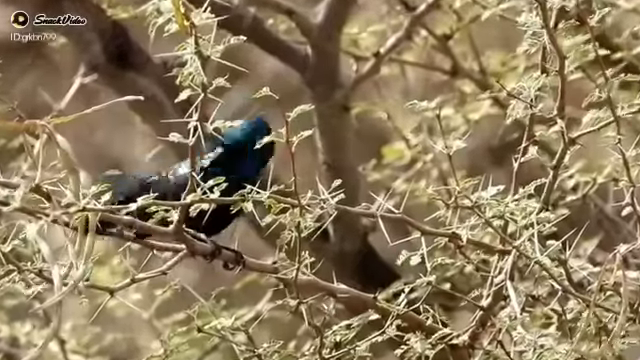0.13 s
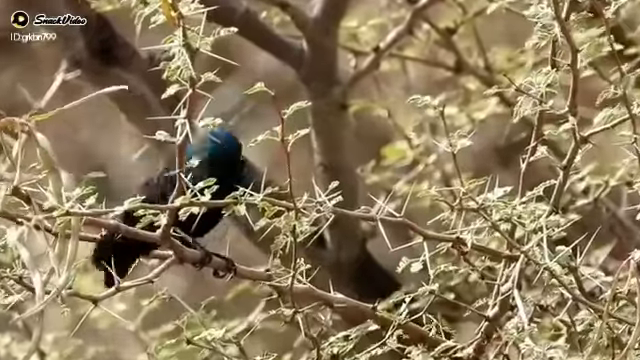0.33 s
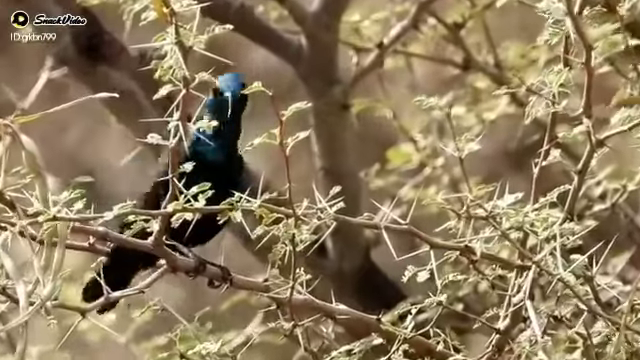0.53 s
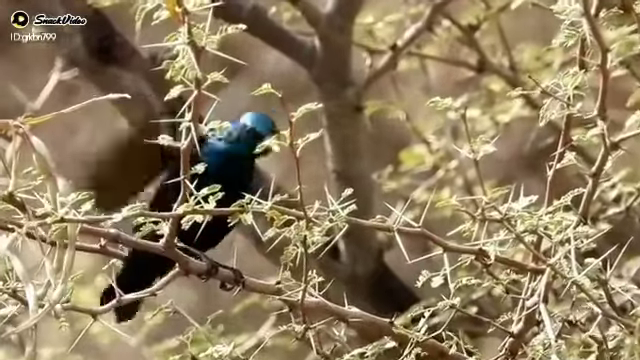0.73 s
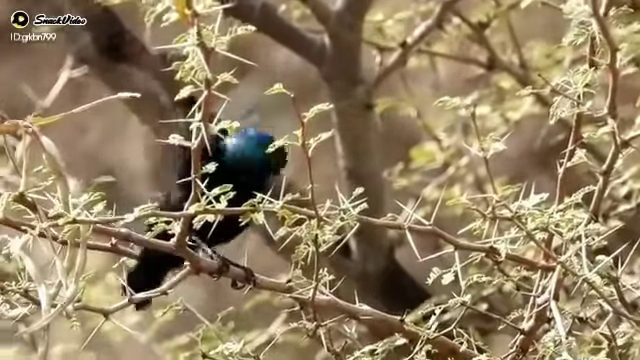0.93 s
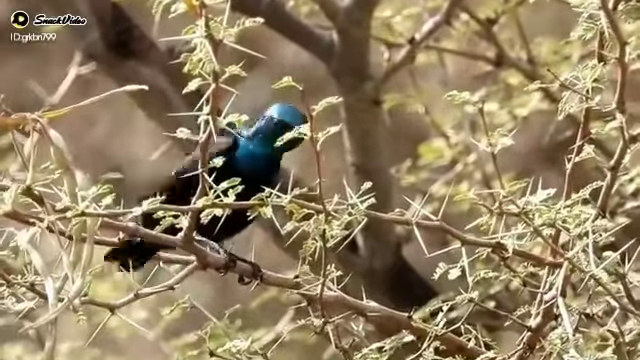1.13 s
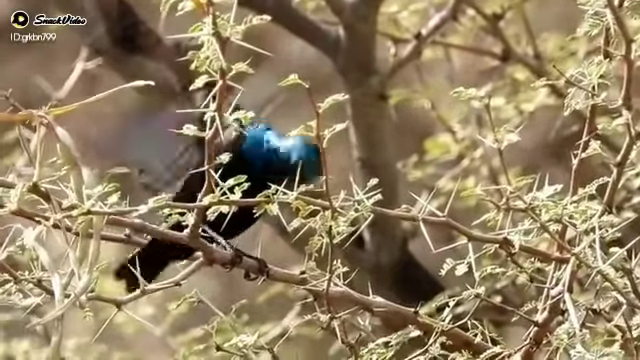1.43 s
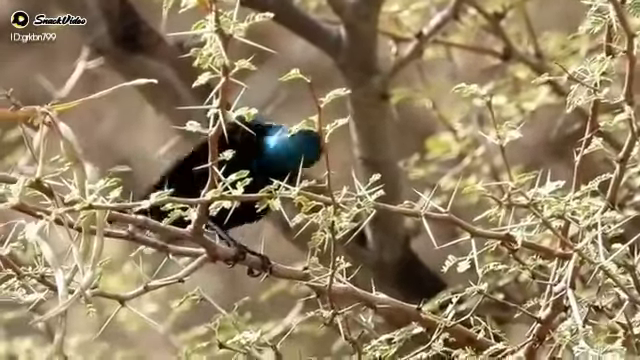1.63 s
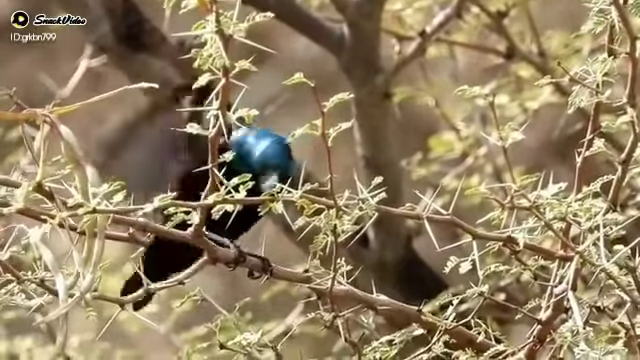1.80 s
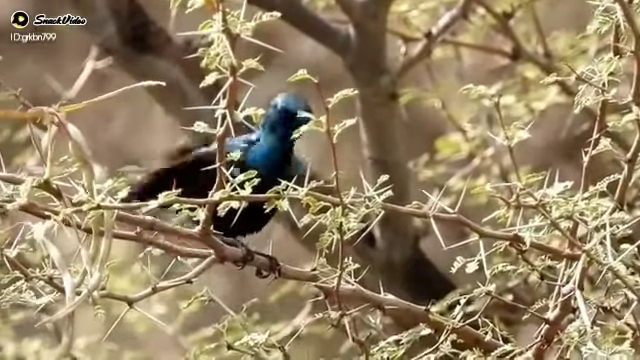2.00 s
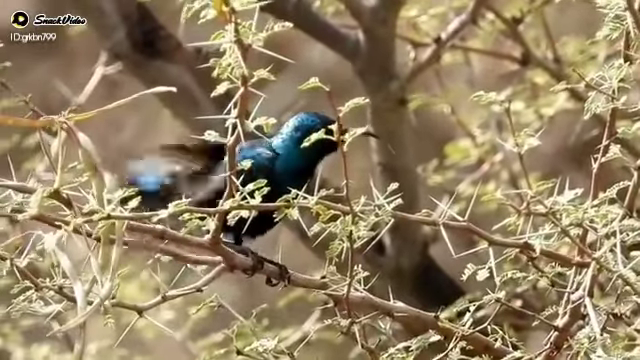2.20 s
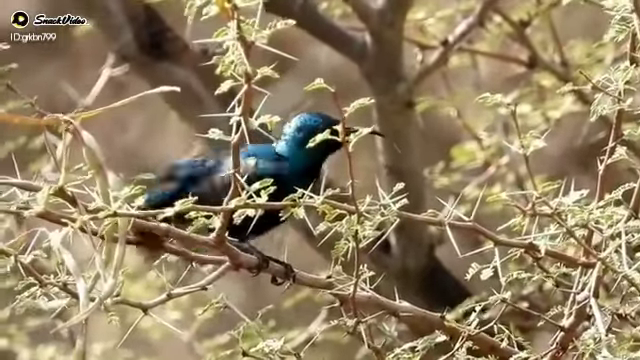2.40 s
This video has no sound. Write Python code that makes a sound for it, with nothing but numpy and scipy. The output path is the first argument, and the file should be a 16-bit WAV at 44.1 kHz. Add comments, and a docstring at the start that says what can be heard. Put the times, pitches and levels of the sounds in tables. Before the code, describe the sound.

A small bird repeats a broken, husky two-part whistle while another gives sharp raspy chirps outdoors

```python
"""A low outdoor wash, an insect-like hiss (both shaped noise) and a far, wavering hum (a sine) come first.
Then a bird gives short raspy chirps, mostly a little louder on the right: pulses and breath ring its throat.
Another bird in the thorn bush repeats a two-part whistle near 2.7 kHz, made of gliding sines.
The whistle breaks every few hundredths of a second, with husky side notes, breath and buzzy flares around it.
Noise tails that fade add the echo of the bush and a slower, fainter answer to the whistle."""
import sys
import numpy as np
from scipy import signal
from scipy.fft import rfft, irfft, next_fast_len
from scipy.io import wavfile
from scipy.ndimage import uniform_filter1d, map_coordinates

SR = 44100
rng = np.random.default_rng(int(sys.argv[2]) if len(sys.argv) > 2 else 0)


def generate_wav(sig):
    """Save sig (samples, or channels by samples) to the path in sys.argv[1] as 16-bit PCM at SR."""
    pcm = np.round(np.clip(np.atleast_2d(sig).T, -1, 1) * 32767).astype(np.int16)
    wavfile.write(sys.argv[1], SR, pcm)


N = 112454  # samples, about 2.55 s


def amp(db):
    """Decibels to gain."""
    return 10 ** (np.asarray(db) / 20)


def unit(x):
    """Scale to an average power (rms) of 1."""
    return x / np.sqrt(np.mean(x ** 2) + 1e-20)


def along(points, hz):
    """Read a table of (frequency, value) points on a logarithmic pitch axis."""
    f, v = np.transpose(points)
    return np.interp(np.log(hz + 1), np.log(f + 1), v, left=v[0], right=v[-1])


def curve(rows):
    """Join (time, value) rows with straight lines, one value per sample."""
    return np.interp(np.arange(N) / SR, *np.transpose(rows))


def wobble(rate):
    """A smooth random curve around 0 through this many random points a second."""
    points = rng.standard_normal(int(N / SR * rate) + 4)
    return map_coordinates(points, [np.arange(N) * rate / SR])


def filtered(x, response):
    """Change the strength and phase of each frequency as the response says."""
    m = next_fast_len(N + SR // 2)
    return irfft(rfft(x, m) * response(np.fft.rfftfreq(m, 1 / SR)), m)[..., :N]


def coloured(spectrum):
    """Mono noise of rms 1, silent outside the spectrum."""
    def response(f):
        inside = (f > spectrum[0][0]) & (f < spectrum[-1][0])
        return amp(along(spectrum, f)) * inside
    return unit(filtered(rng.standard_normal(N), response))


def peak(hz, wide_hz):
    """A resonance: a hollow space favours frequencies around one pitch."""
    return lambda f: 1j * f * wide_hz / (hz * hz - f * f + 1j * f * wide_hz)


def swell(at, rise, fall, top_s):
    """A rounded peak at a time in s, with straight flanks in dB/s."""
    u = np.arange(N) / SR - at
    slope = np.where(u < 0, rise, fall)
    return amp(-slope * (np.sqrt(u * u + top_s ** 2) - top_s))


# How alike the background noise is in both ears: (frequency [Hz], likeness [-1 to 1])
LIKENESS = [(80, 0.33), (150, 0.98), (370, 0.94), (900, 0.77), (2240, 0.62), (5520, 0.016), (13600, 0.78)]


def rush(spectrum, patchy_db):
    """Stereo noise of rms 1: patches in time and pitch differ in strength, and the ears differ by pitch."""
    z = signal.stft(rng.standard_normal((2, N)), nperseg=512)[2]
    patches = uniform_filter1d(rng.standard_normal(z.shape[1:]), 5, 0)
    patches = unit(uniform_filter1d(patches, 12, 1))
    pair = signal.istft(z * amp(patchy_db * patches), nperseg=512)[1][:, :N]

    def response(hz):
        gain = amp(along(spectrum, hz)) * (hz > spectrum[0][0])
        turn = np.arccos(np.clip(along(LIKENESS, hz), -1, 1)) / 2
        return gain * [np.cos(turn), np.sin(turn)]  # shared part, opposite part
    mid, side = filtered(pair, response)
    return unit(np.array([mid + side, mid - side]))


# Low wash, tone colour: (frequency [Hz], relative level [dB])
WASH_SPECTRUM = [(15, -63), (25, -18.5), (75, -26), (202, -2), (298, -8), (525, -9), (805, -7.5),
                 (1010, -15.5), (2780, -14), (3200, -32), (4160, -49.5), (7040, -120)]
# Low wash, loudness before its small wobble: (time [s], level [dB])
WASH_LOUDNESS = [(0, -48), (1.1, -48), (1.4, -49.5), (2.15, -47), (2.26, -53), (2.4, -54), (2.55, -52)]


def low_wash():
    """Low outdoor noise whose level slowly shifts."""
    level_db = curve(WASH_LOUDNESS) + 0.39 * wobble(3.1)
    return amp(level_db) * rush(WASH_SPECTRUM, patchy_db=2.2)


# Insect-like hiss, tone colour: (frequency [Hz], relative level [dB])
HISS_SPECTRUM = [(2600, -22), (3200, -10), (4100, 0), (5300, 1.7), (6600, -11.5), (8600, -15.5),
                 (10500, -18.5), (12000, -36.5), (12600, -66.5), (14000, -67.5)]
# Insect-like hiss, loudness before its small wobble: (time [s], level [dB])
HISS_LOUDNESS = [(0, -46.5), (.6, -46), (.95, -47), (1.3, -55.5), (1.6, -48), (2.0, -50), (2.42, -55.5),
                 (2.55, -56.5)]


def insect_hiss():
    """High noise, strongest around 4 to 5 kHz, with changing level."""
    level_db = curve(HISS_LOUDNESS) + 0.3 * wobble(9.78)
    return amp(level_db) * rush(HISS_SPECTRUM, patchy_db=3)


HUM_HZ, HUM_WIDE_HZ = 197.9, 14.4  # centre; twice the typical pitch wander
HUM_DB, HUM_WAVER_DB = -54.5, 4  # middle level; largest swing up or down


def far_hum():
    """A low sine whose pitch and level wander at random."""
    pitch = HUM_HZ + HUM_WIDE_HZ / 2 * wobble(11)
    level_db = HUM_DB + HUM_WAVER_DB * np.tanh(wobble(7.2))
    return np.sqrt(2) * amp(level_db) * np.sin(2 * np.pi * np.cumsum(pitch) / SR)


FLOOR_LEFT_DB = -0.8  # left ear compared with right


def surroundings():
    """Wash, hiss and hum add up, slightly weaker on the left."""
    balance = amp([[FLOOR_LEFT_DB / 2], [-FLOOR_LEFT_DB / 2]])
    return (low_wash() + insect_hiss() + far_hum()) * balance


def echo(x, decays):
    """Branches and ground scatter the sound; each frequency dies at its own speed, within half a second."""
    hz, t, z = signal.stft(rng.standard_normal((2, SR // 2)), SR, nperseg=256)
    fading = amp(-60 * t / along(decays, hz)[:, None])
    tail = signal.istft(z * fading, SR, nperseg=256)[1]
    return signal.fftconvolve(np.atleast_2d(x), tail / np.linalg.norm(tail[0]), axes=1)[:, :N]


# How long the bush rings: (frequency [Hz], time to fade by 60 dB [s])
BUSH_DECAY = [(2000, 0.1), (3000, 0.39), (5500, 0.32), (10000, 0.078)]


def bush_echo(x):
    """The short scattering tail of the bush, used for both birds."""
    return echo(x, BUSH_DECAY)


THROAT_WIDE_HZ, SKIRT_DB = 290, -11  # spread of the main band; level of its skirt


def throat(hz):
    """The throat favours a bell-shaped band, with a weak skirt three times as broad."""
    def bell(f, wide):
        return np.exp(-.5 * ((f - hz) / wide) ** 2)
    return lambda f: bell(f, THROAT_WIDE_HZ) + amp(SKIRT_DB) * bell(f, 3 * THROAT_WIDE_HZ)


PULSES_PER_S, PULSE_SCATTER = 175, .2  # middle rate; its random spread (natural log)
PULSE_DB, BREATH_DB = 2.5, -2  # pulse unevenness; shared breath compared with the pulses
CHIRP_SPREAD_DB = 3  # each ear's own noise compared with the shared noise


def two_ear_noise():
    """Noise shared by both ears plus separate noise in each."""
    shared = rng.standard_normal(N)
    return shared + amp(CHIRP_SPREAD_DB) * rng.standard_normal((2, N))


def rasp_drive():
    """Uneven pulses of random sign, mixed with breath."""
    rate = PULSES_PER_S * np.exp(PULSE_SCATTER * wobble(120))
    beat = np.floor(np.cumsum(rate) / SR)
    pulses = np.diff(beat, prepend=0) * amp(PULSE_DB * wobble(300)) * np.sign(wobble(400))
    return unit(pulses) + amp(BREATH_DB) * two_ear_noise()


TOP_S, FIZZ_TOP_S = .015, .004  # rounding of the throat peak and of the hiss peak
FIZZ_LEAD_S, FIZZ_RISE, FIZZ_FALL = 0.023, 1, 0.36  # hiss peaks earlier; its slopes over the chirp's
FIZZ_GRAIN_DB = 3  # fast roughness of the hiss
CHIRP_LAG_S, CHIRP_ECHO_DB = .00001, -15.5  # left ear leads; echo level
# Raspy chirps: (peak time [s], rise [dB/s], fall [dB/s], level [dB], throat pitch [Hz],
# left over right [dB], hiss over throat sound [dB], brightness [stretch of the hiss spectrum])
RASPY_CHIRPS = [(0.252, 1200, 800, -20, 5220, -4, -13, .62), (1.02, 1000, 750, -23, 5300, -2.5, -11, .98),
                (1.747, 700, 1300, -17, 5350, -0.3, -10, .97),
                (2.248, 1300, 1100, -19, 5500, -4.5, -13, 1.1), (2.366, 600, 600, -33.5, 5850, -3, -10, .9),
                (1.673, 300, 203, -41, 5250, -2, -8, .8), (1.858, 450, 450, -39, 5020, -1.5, -15, .75),
                (2.52, 400, 400, -50, 5630, 0, -10, .75), (0.701, 254, 255, -50, 5300, 0, -15, .75),
                (1.40, 350, 300, -50, 5270, -2, -12, .75)]
# Chirp hiss, tone colour at brightness 1: (frequency [Hz], relative level [dB])
CHIRP_HISS = [(2300, -22), (3600, -12), (4500, -17), (6000, -13.5), (6900, -2), (7600, -11.5), (8500, -19),
              (10500, -32.5), (12500, -50), (14200, -66.5)]


def rasper():
    """Pulses and breath ring the throat; a broad hiss peaks before each ring."""
    drive, air = rasp_drive(), two_ear_noise()
    grain = amp(FIZZ_GRAIN_DB * wobble(350))
    chirps = np.zeros((2, N))
    for s, rise, fall, db, hz, left_db, hiss_db, bright in RASPY_CHIRPS:
        fizz = unit(filtered(air, lambda f: amp(along(CHIRP_HISS, f / bright)) * (f > CHIRP_HISS[0][0])))
        hiss_shape = swell(s - FIZZ_LEAD_S, rise * FIZZ_RISE, fall * FIZZ_FALL, FIZZ_TOP_S)
        hiss = amp(hiss_db) * grain * fizz * hiss_shape
        ring = unit(filtered(drive, throat(hz))) * swell(s, rise, fall, TOP_S)
        balance_db = np.array([[left_db], [-left_db]]) / 2
        chirps += amp(db + balance_db) * (ring + hiss)
    # a phase that grows with frequency is a tiny time shift
    near = filtered(chirps, lambda f: np.exp(1j * np.pi * np.outer([1, -1], f * CHIRP_LAG_S)))
    return near + amp(CHIRP_ECHO_DB) * bush_echo(chirps)


EDGE_S, OCTAVE_DB = .0022, -42  # half the fade time; octave compared with the main tone
DROOP, ARCH_DB = 1.5, 1.5  # a note holds, then gives way (power of time); swell in its middle


def notes(rows, quaver_db, quaver_hz, sag_hz):
    """Gliding sines with soft edges, a weak octave and random quaver; also returns their envelope."""
    t, out, level = np.arange(N) / SR, np.zeros(N), np.zeros(N)
    shake, drift = amp(quaver_db * wobble(220)), quaver_hz * wobble(160)
    for s, length, hz0, hz1, db0, db1 in rows:
        span = slice(int((s - EDGE_S) * SR), int((s + length + EDGE_S) * SR))
        u = t[span] - s
        to_edge = np.minimum(u + EDGE_S / 2, length + EDGE_S / 2 - u)
        edge = np.sin(np.pi / 2 * np.clip(to_edge / (2 * EDGE_S), 0, 1)) ** 2
        pitch = hz0 + (hz1 - hz0) * u / length + drift[span] - sag_hz * (1 - edge)
        phase = 2 * np.pi * np.cumsum(pitch) / SR
        level_db = db0 + (db1 - db0) * abs(u / length) ** DROOP + ARCH_DB * np.sin(np.pi * u / length)
        gain = edge * amp(level_db) * shake[span]
        out[span] += np.sqrt(2) * gain * (np.sin(phase) + amp(OCTAVE_DB) * np.sin(2 * phase))
        level[span] += gain
    return out, level


ASIDE_S = .006  # length of each side note
# Faint husky low notes in the breaks, before quaver and swell: (time [s], pitch [Hz], level [dB])
SIDE_NOTES = [(.431, 2150, -33), (.462, 2340, -32), (.505, 2350, -28), (.529, 2310, -29), (.851, 2190, -30),
              (.875, 2190, -32.5), (1.191, 2200, -26), (1.2125, 2153, -25), (1.586, 2200, -31),
              (1.608, 2230, -31), (1.6375, 2200, -27), (2.128, 2300, -29), (2.150, 2270, -29)]


def side_notes():
    """Very short, shaky low sines in the breaks of the whistle."""
    rows = [(s, ASIDE_S, hz, hz, db, db) for s, hz, db in SIDE_NOTES]
    return notes(rows, quaver_db=-5.0, quaver_hz=38.5, sag_hz=0)[0]


FLARE_HZ, FLARE_WIDE_HZ, FLARE_TOP_S = 3450, 450, 0.006  # upper band, resonance width, peak rounding
FLARE_LOW_HZ, FLARE_LOW_DB = 2036, -6  # lower band and its relative level
# Buzzy flares between the two parts of the whistle:
# (peak time [s], rise [dB/s], fall [dB/s], level [dB])
BUZZ_FLARES = [(0.473, 696, 489, -38.5), (0.812, 912.5, 509, -33.5), (1.156, 905, 512.5, -35),
               (1.594, 900, 610, -39), (2.094, 593, 601, -35.5)]


def buzzy_flares():
    """Noise through two resonances swells up and dies away."""
    def two_bands(f):
        upper = peak(FLARE_HZ, FLARE_WIDE_HZ)(f) ** 2
        lower = peak(FLARE_LOW_HZ, FLARE_WIDE_HZ)(f) ** 2
        return upper + amp(FLARE_LOW_DB) * lower
    buzz = unit(filtered(rng.standard_normal(N), two_bands))
    return buzz * sum(amp(db) * swell(s, rise, fall, FLARE_TOP_S) for s, rise, fall, db in BUZZ_FLARES)


HUSK_DB, HAZE_DB = -27, -25.5  # breath and high breath compared with the whistle
JOIN_DB, JOIN_S = -28, 0.07  # gain and reach of the breath that bridges the gaps
# Breath around the whistle, tone colour: (frequency [Hz], relative level [dB])
BREATH_SPECTRUM = [(1900, -42), (2100, 3), (2500, 3.5), (2900, 9.5), (3100, -33.5)]
# Breathy overtone, tone colour: (frequency [Hz], relative level [dB])
HIGH_BREATH_SPECTRUM = [(3900, -19.5), (4400, 6), (5000, -14.5), (5700, 8), (6300, -10), (8000, -10.5),
                        (8600, -29.5)]


def breath(level):
    """Noise follows the whistle's envelope; a raspy share reaches across the gaps."""
    near = uniform_filter1d(level, size=300)
    wide = np.sqrt(abs(uniform_filter1d(level, int(JOIN_S * SR))))
    strength = amp(HUSK_DB) * near + amp(JOIN_DB) * wide
    husk = strength * coloured(BREATH_SPECTRUM) * amp(0.61 * wobble(240))
    return husk + amp(HAZE_DB) * near * coloured(HIGH_BREATH_SPECTRUM)


QUAVER_DB, QUAVER_HZ = .7, 14  # typical random shake of level and pitch
EDGE_SAG_HZ = 350  # the pitch swoops low at each edge
WHISTLE_ECHO_DB = -19
FAR_DB, FAR_T60_S = -27, .7  # slow answer of the surroundings: level, fade rate as time per 60 dB
# Unbroken stretches of the whistle, before quaver, swell and edge swoop: (time [s], length [s],
# first pitch [Hz], last pitch [Hz], first level [dB], last level [dB])
WHISTLE_NOTES = [ (.419, 0.013, 2350, 2500, -36, -35), (.435, 0.013, 2800, 2530, -24, -32.5),
                 (.450, 0.0046, 2650, 2560, -22, -29), (.479, 0.0041, 2600, 2620, -26, -25),
                 (.485, 0.026, 2828, 2780, -22.5, -24.5), (.508, 0.012, 2844, 2690, -19, -40),
                 (.515, 0.015, 2790, 2820, -23, -29.5), (.525, 0.0069, 2670, 2800, -19, -19.5),
                 (.533, 0.039, 2880, 2771, -21, -34.5), (.762, 0.013, 2445, 2340, -34, -34.5),
                 (.777, 0.024, 2715, 2550, -23, -37), (.822, 0.0067, 2660, 2840, -22, -26.5),
                 (.828, 0.024, 2710, 2877, -21.5, -20.5), (.856, 0.016, 2680, 2930, -17, -29),
                 (.872, 0.0056, 2920, 2720, -19, -25.5), (.880, 0.0054, 2800, 2780, -17.5, -27.5),
                 (.885, .029, 2844, 2937, -20, -31.5), (1.105, .008, 2550, 2550, -31, -33),
                 (1.1175, .013, 2720, 2640, -22.5, -33), (1.133, .006, 2760, 2700, -28, -33),
                 (1.160, .005, 2760, 2750, -24, -26), (1.168, .0235, 2824, 2690, -19.5, -16),
                 (1.196, .0175, 2750, 2790, -18, -18), (1.2175, .028, 2730, 2820, -15, -22),
                 (1.246, .014, 2820, 2800, -25, -34), (1.548, .014, 2620, 2600, -33, -29),
                 (1.564, .013, 2700, 2760, -26, -24), (1.607, .0035, 2700, 2700, -25, -28),
                 (1.612, .026, 2780, 2760, -24, -18), (1.6425, .046, 2700, 2745, -19, -19.5),
                 (1.688, .012, 2790, 2760, -28, -35), (2.039, 0.017, 2410, 2500, -38, -33),
                 (2.055, 0.012, 2610, 2610, -26.5, -34.5), (2.067, 0.011, 2490, 2870, -34, -27),
                 (2.106, 0.0225, 2683, 2600, -23, -17) , (2.134, 0.008, 2600, 2600, -22, -26),
                 (2.143, 0.007, 2690, 2540, -23, -22), (2.1555, 0.032, 2610, 2660, -21, -25),
                 (2.188, .009, 2650, 2600, -31, -34) ]


def whistler():
    """The broken whistle, its side notes, flares and breath, and their echoes."""
    tone, level = notes(WHISTLE_NOTES, QUAVER_DB, QUAVER_HZ, EDGE_SAG_HZ)
    voice = tone + side_notes() + buzzy_flares() + breath(level)
    far_answer = echo(tone, [(2800, FAR_T60_S)])
    return voice + amp(WHISTLE_ECHO_DB) * bush_echo(voice) + amp(FAR_DB) * far_answer


def scene():
    """Both birds in their surroundings."""
    return surroundings() + rasper() + whistler()


TOP_HZ = 14250  # band limit


def record(dry):
    """Nothing passes above the band limit."""
    return filtered(dry, lambda hz: hz < TOP_HZ)


dry = scene()
out = record(dry)
generate_wav(out)
```